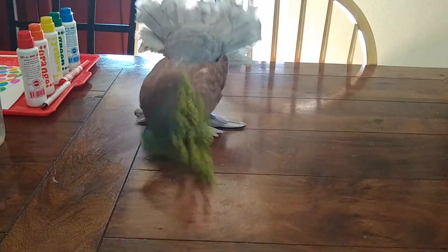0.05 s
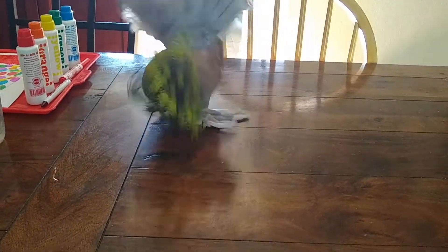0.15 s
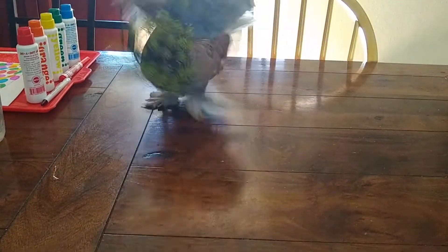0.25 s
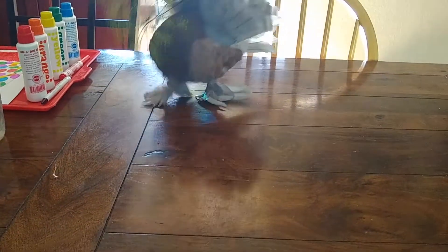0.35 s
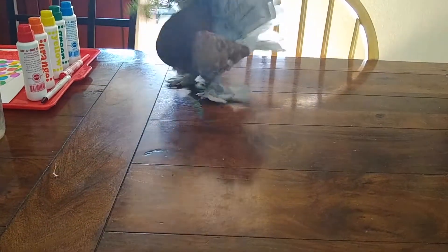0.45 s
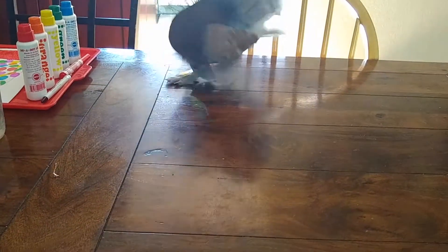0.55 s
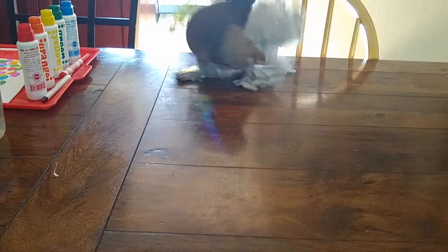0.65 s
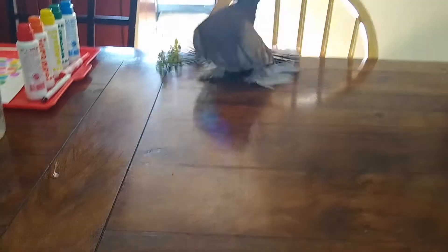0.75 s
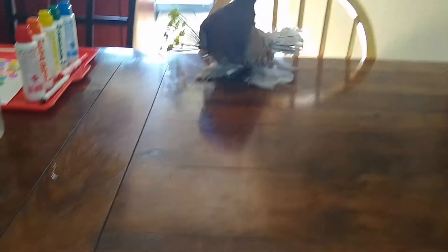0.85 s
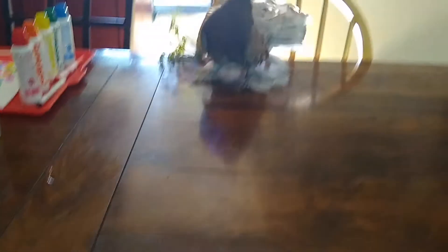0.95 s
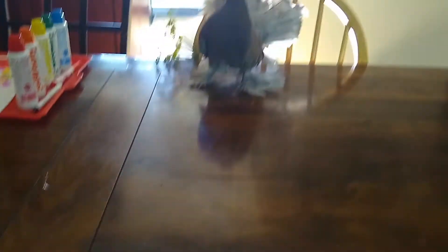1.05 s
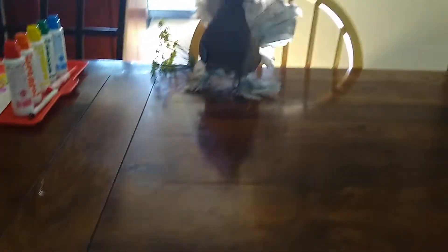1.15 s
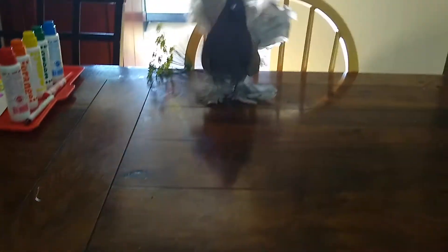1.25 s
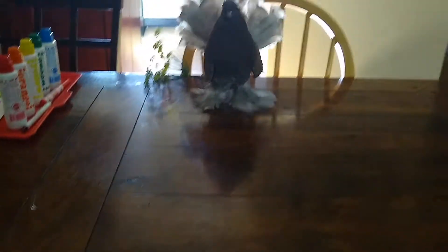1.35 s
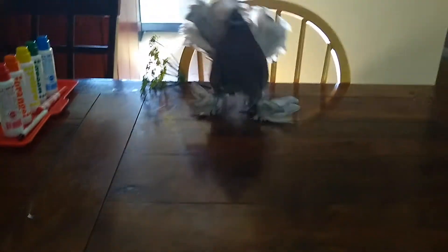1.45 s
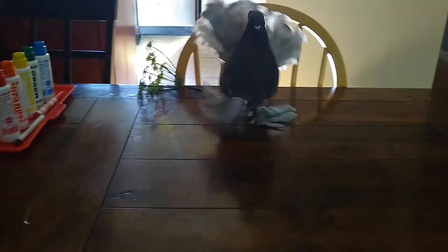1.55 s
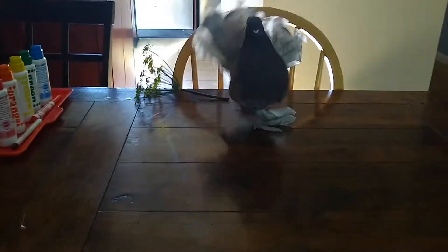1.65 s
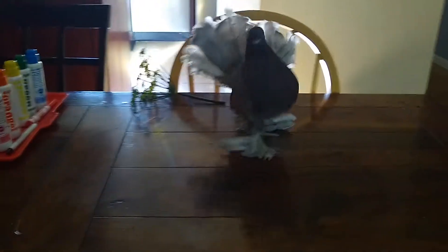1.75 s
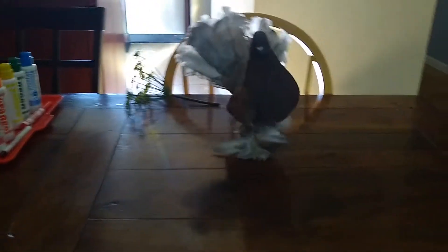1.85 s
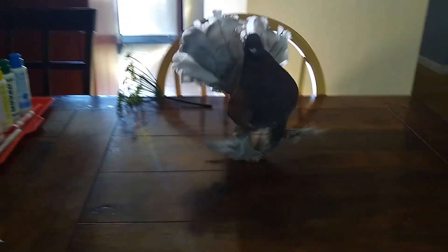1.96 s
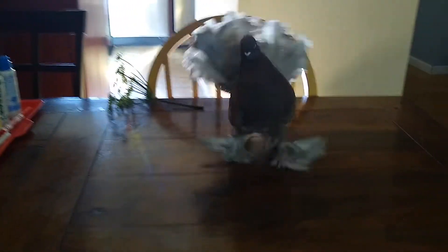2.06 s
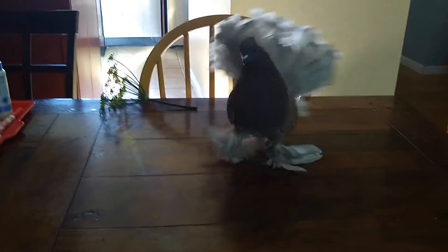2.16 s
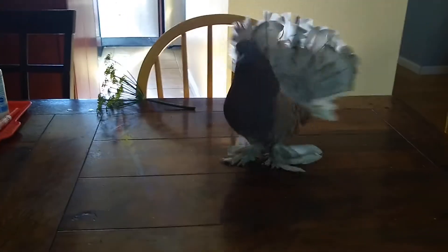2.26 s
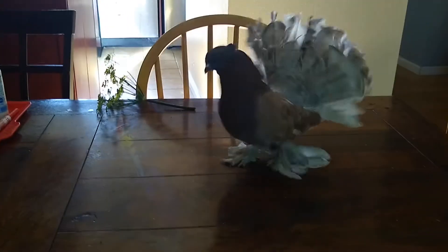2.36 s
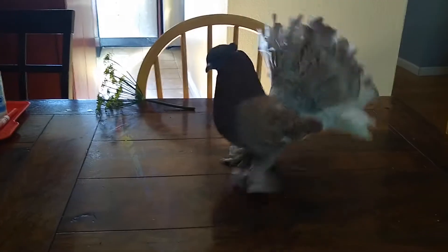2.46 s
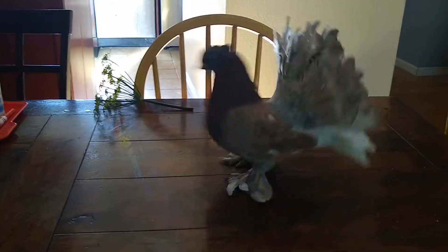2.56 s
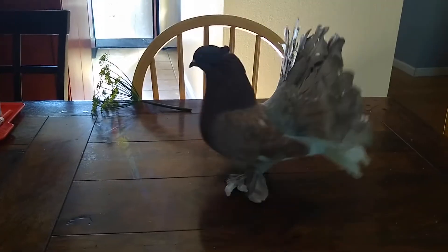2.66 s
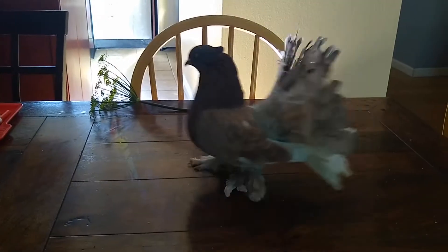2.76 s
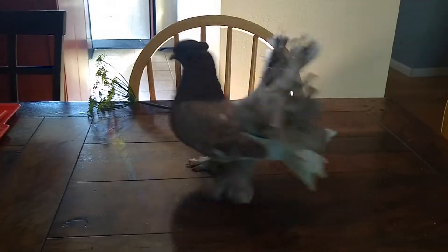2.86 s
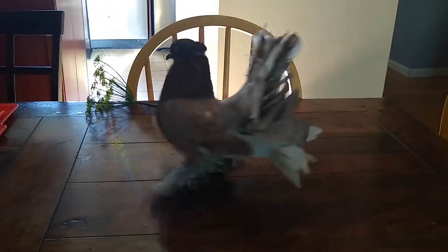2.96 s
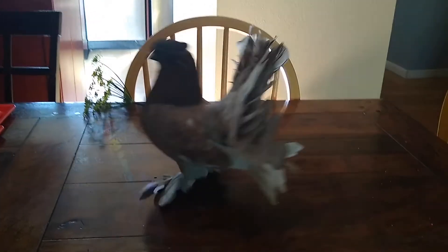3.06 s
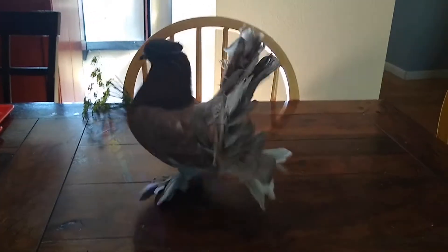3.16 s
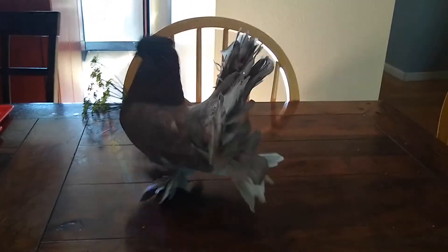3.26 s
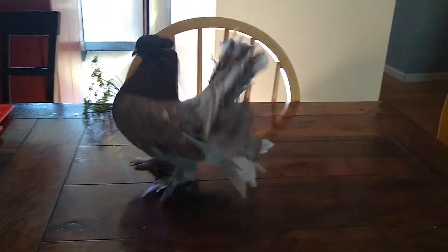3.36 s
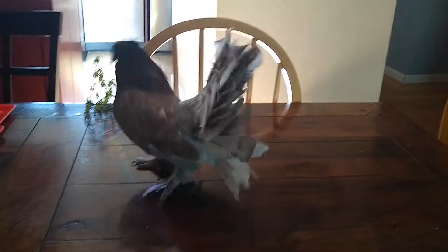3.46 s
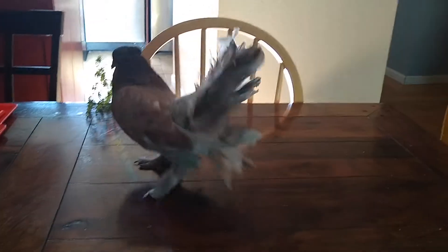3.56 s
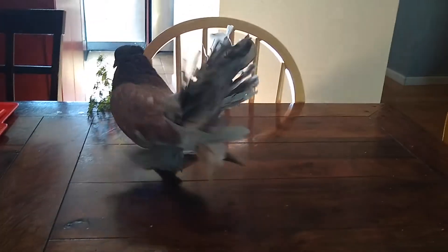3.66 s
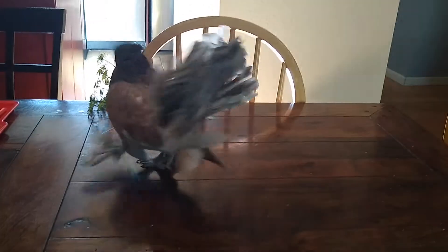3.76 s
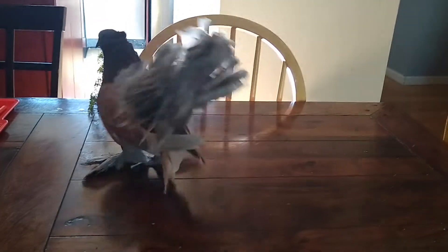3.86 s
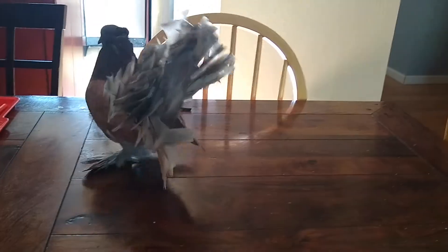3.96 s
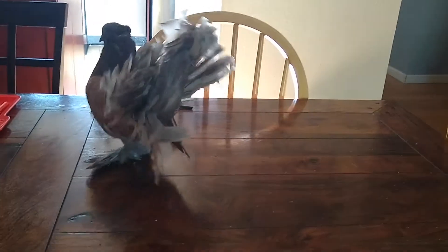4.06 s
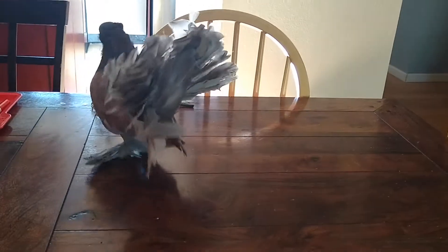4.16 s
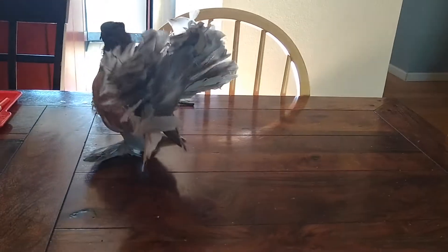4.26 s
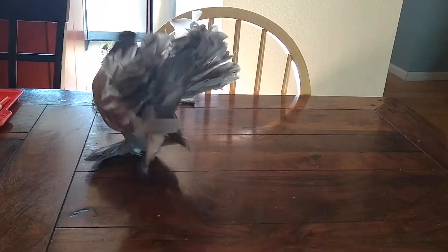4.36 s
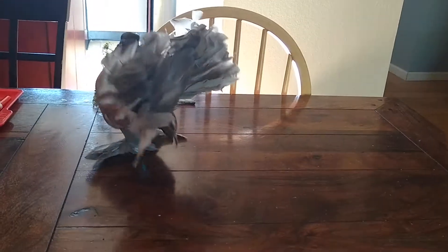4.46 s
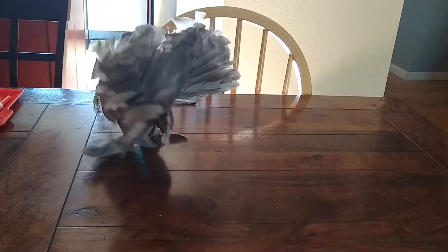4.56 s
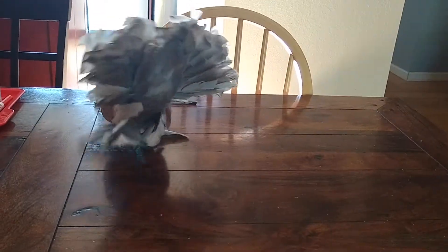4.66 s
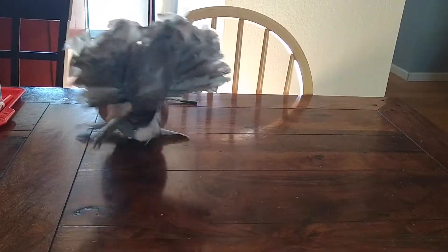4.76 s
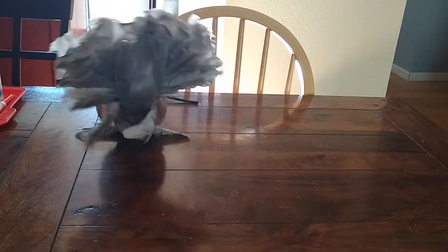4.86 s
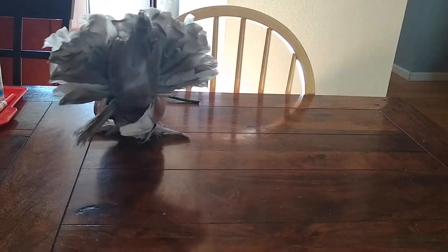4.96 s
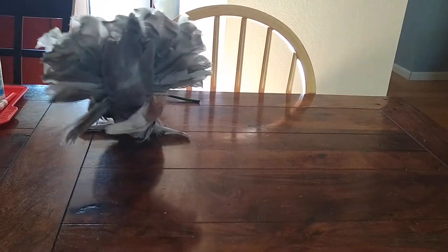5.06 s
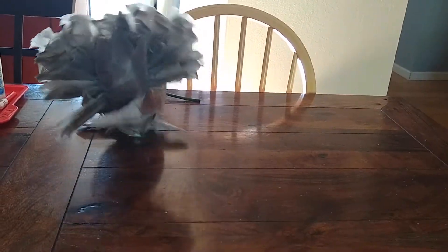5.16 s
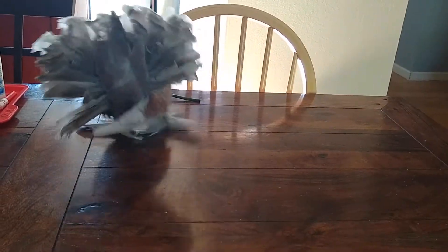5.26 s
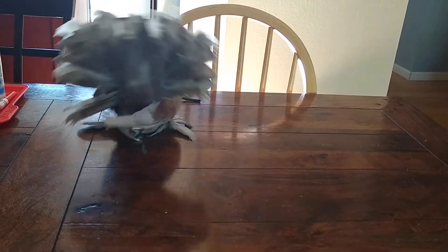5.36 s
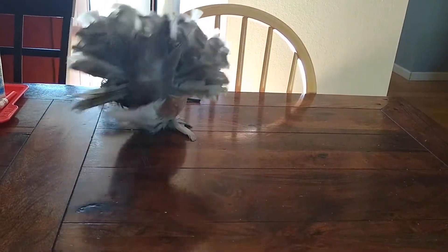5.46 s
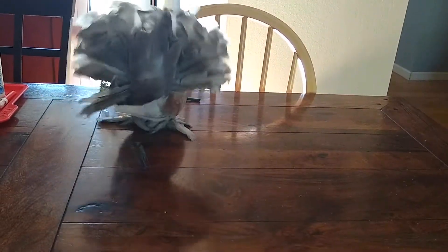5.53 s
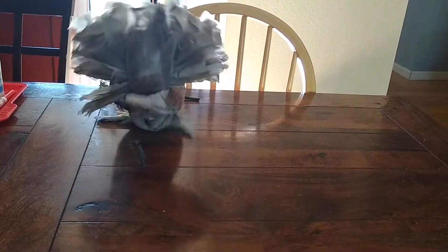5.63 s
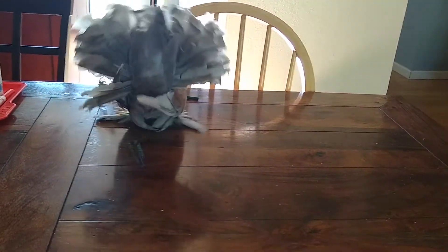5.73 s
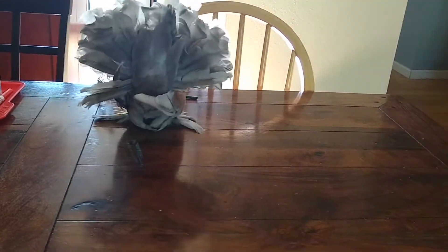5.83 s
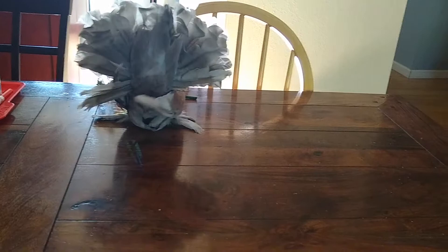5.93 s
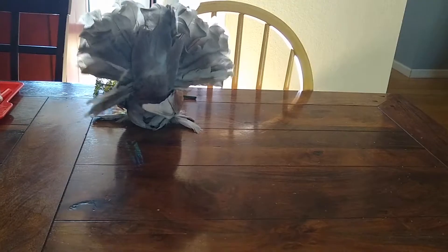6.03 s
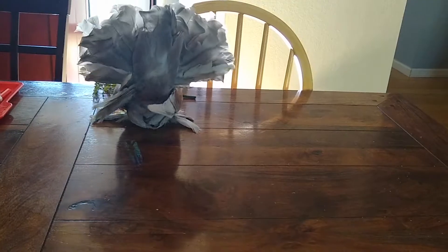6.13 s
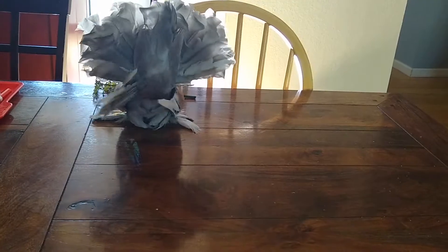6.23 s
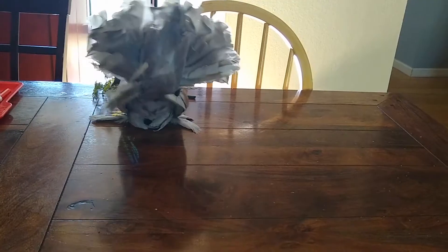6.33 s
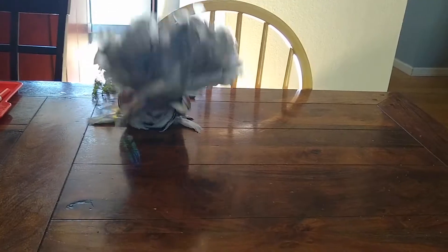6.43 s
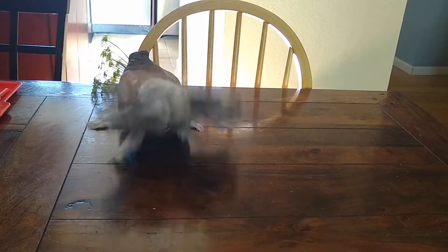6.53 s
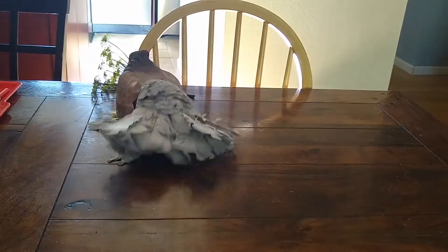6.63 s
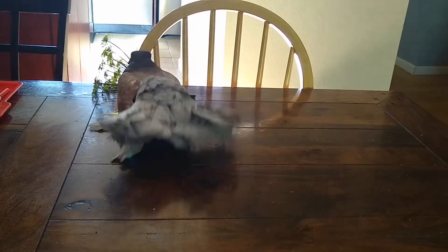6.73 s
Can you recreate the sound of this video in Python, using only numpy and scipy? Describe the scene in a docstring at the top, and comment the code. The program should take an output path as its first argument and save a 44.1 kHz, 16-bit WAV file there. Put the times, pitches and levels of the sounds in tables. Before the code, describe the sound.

A pigeon hops across a wooden tabletop with a few sharp knocks and claw clicks, then pads softly in a quiet ticking room.

```python
"""Pigeon on a wooden table

A pigeon hops and walks about on a table top: feet excite its modes, dragged feathers keep some humming.
Claws and quills are short filtered noise bursts; a diffuse rustle is grainy, uneven noise in three bands.
A wall clock ticks about once a second as decaying case modes, in a live room over a quiet hush.
A phone's two microphones are steered left and right by subtracting each, delayed, from the other."""
import sys
import numpy as np
from scipy import signal
from scipy.fft import rfft, irfft, next_fast_len
from scipy.io import wavfile
from scipy.ndimage import uniform_filter1d

SR = 44100
rng = np.random.default_rng(int(sys.argv[2]) if len(sys.argv) > 2 else 0)


def generate_wav(sig):
    """Save sig (samples, or channels by samples) to the path in sys.argv[1] as 16-bit PCM at SR."""
    pcm = np.round(np.clip(np.atleast_2d(sig).T, -1, 1) * 32767).astype(np.int16)
    wavfile.write(sys.argv[1], SR, pcm)


N = 299439
HZ = np.fft.rfftfreq(next_fast_len(N), 1 / SR)  # spectrum bins

# modes of the table top, before each foot or brush weights them: f/Hz, level/dB, t60/s
TABLE_MODES = [(107, -1, .12), (138.5, 3.5, 0.4), (160.8, 4.5, 0.18), (200, -11.5, 0.07), (222, -4, 0.062),
               (300, 3.5, 0.14), (324.2, 0.5, 0.18), (342.2, -20.5, .07), (397, 3, 0.14), (460, -7, 0.024),
               (526, -6.5, 0.12), (597.5, 0, .06), (631, 0.5, 0.059), (706, 1, 0.039), (772.4, 8, 0.054),
               (811.6, -0.5, 0.032), (856.5, -5, 0.0085), (1063, -8, 0.039), (1070, -1.5, .05),
               (1205, 8, 0.038), (1236, 3, 0.051), (1490, 2, 0.034), (1497, -7.5, 0.1),
               (1714.5, -2.5, 0.18), (1780, -8.5, 0.092), (1913, 2.5, 0.061), (2400, -9.5, 0.21),
               (2384, -5, 0.12), (2752, -10.5, 0.0099)]
# contact level at which the basic ring, scuff and scratch settings hold
HARD_DB = -15


def undb(db):
    """Level as the logarithm of amplitude: converts decibels to gain."""
    return 10 ** (np.asarray(db) / 20)


def band(x, hz, width):
    """Two-pole resonance: a band-pass with gain 1 at its centre."""
    b, a = signal.iirpeak(min(hz, .45 * SR), hz / width, SR)
    return signal.lfilter(b, a, x)


def shape(x, gain):
    """Linear filtering in the frequency domain: one gain for every bin of HZ."""
    spectrum = rfft(x, 2 * len(HZ) - 2)
    return irfft(spectrum * gain)[..., :N]


def ring(hz, db, t60, turn=0, seconds=.4):
    """Modal superposition: decaying sines, each starting at its own part of a turn, scaled to peak 1."""
    t = np.arange(int(seconds * SR))[:, None] / SR
    decay = 1000. ** (-t / t60)
    modes = undb(db) * np.sin(2 * np.pi * (hz * t + turn)) * decay
    x = modes.sum(axis=1)
    return x / abs(x).max()


def add(out, s, x, lag_ms):
    """Difference in arrival time: mixes a sound into both ports, the right one later by the lag."""
    for port, late in enumerate((-lag_ms / 2000, lag_ms / 2000)):
        i = int((s + late) * SR)
        out[port, i:i + len(x)] += x[:N - i]


def walk(rate):
    """Slow random modulation: levels held 1 / rate s and slewed twice, with a spread near 0.3."""
    k = int(SR / rate)
    held = np.repeat(rng.standard_normal(N // k + 1), k)
    return 0.43 * uniform_filter1d(uniform_filter1d(held, k), k)[:N]


def steps(rise_ms=0.18, toes=0.485, toe_ms=2.09, lift_octaves=0.18, scatter=0.15):
    """Impact excitation of modes: the pad sinks in, a second toe follows, and the foot scuffs as it settles."""
    # feet landing: t/s, level/dB, bass share/dB, upper share/dB, favoured f/Hz, its lift/dB
    landings = [(0.115, -56, -7, -2, 980, 9), (0.218, -55.5, 0, 4, 646, 2), (0.266, -19, 2.5, 5, 1030, 2.5),
                (0.556, -14.5, -11.5, -6, 640, 1.5), (0.716, -37.5, 3.5, -6, 607, 11),
                (0.862, -10.5, -8.5, -2.5, 799, -3), (1.372, -28.5, -3.5, -7.5, 728, -0.5),
                (1.87, -46, 3, 0.5, 794, 4.5), (2.186, -51, 4.5, 0, 571, 7),
                (2.368, -43, -3, -3, 145, 19.5), (2.431, -54, -9, -2, 967, 2),
                (2.598, -51, 2, -10.5, 433, 7.5), (2.871, -47, 7.5, -6, 432, 7),
                (3.114, -48, 1.5, -12, 636, 7), (3.411, -47.5, -5, 7.5, 770, 4.5),
                (3.942, -49, 1.5, 3, 843, 1.5), (4.179, -42.5, -2.5, -1.5, 1400, 8.5),
                (4.904, -46, 3, 1, 515, 12.5), (5.399, -57.5, 0, -5.5, 293.4, 9),
                (5.603, -49.5, 1.5, -9.5, 511, 8), (5.802, -57.5, 4, -0.5, 760, 8)]
    # where bass share, full level and upper share apply: f/Hz
    share_hz = (185, 590, 1440)
    spot_db = 2.5  # each landing spot stirs the modes a little differently
    # softer steps ring longer and scuff more against the direct knock
    ring_stretch, stretch_per_db = .55, 0.0347
    scuff_db, scuff_db_per_db = -9, 0.1442
    scuff_ms, scuff_ms_per_db = 24., 0.78
    pad_hz = 800  # the soft pad damps modes above this, more the higher they are
    out, t = np.zeros((2, N)), np.arange(SR // 4) / SR
    hz, db, t60 = np.transpose(TABLE_MODES)
    chance = rng.standard_normal((len(landings), 3, len(hz)))
    scuffs = rng.standard_normal((len(landings), len(t)))
    for landing, (spot, detune, turn), scuff in zip(landings, chance, scuffs):
        s, level_db, bass_db, upper_db, best_hz, lift_db = landing
        softer_db = HARD_DB - level_db
        stretch = ring_stretch + stretch_per_db * softer_db
        share_db = np.interp(np.log(hz), np.log(share_hz), (bass_db, 0, upper_db))
        share_db += lift_db * np.exp(-(np.log2(hz / best_hz) / lift_octaves) ** 2)
        share_db += spot_db * spot
        step_t60 = t60 * max(stretch, .1) * np.minimum(pad_hz / hz, 1)
        x = ring(hz * (1 + 0.0057 * detune), db + share_db, step_t60, scatter * turn)
        x = x * (1 - np.exp(-1000 * np.arange(len(x)) / SR / rise_ms))
        # the force on the top: scuffing noise, the landing and the second toe
        fade = np.exp(-1000 * t / (scuff_ms + scuff_ms_per_db * softer_db))
        scuff_gain = undb(scuff_db + scuff_db_per_db * softer_db)
        push = scuff_gain * scuff * fade / np.sqrt((fade ** 2).sum())
        push[[0, int(toe_ms * SR / 1000)]] += 1, toes
        step = signal.fftconvolve(x, push) * undb(level_db)
        # levelled by the ring's first 400 samples
        add(out, s, step * .4 / x[:400].std(), lag_ms=0.07)
    return out


def slides(reach_octaves=0.11, lag_ms=.1):
    """Sustained friction excitation: a dragged, feathered foot keeps the modes near one pitch humming."""
    # drags over the top: t/s, length/s, rms level/dB, favoured f/Hz
    drags = [(5.4, 0.092, -63.5, 342), (5.46, 0.072, -64, 155), (6.3, 0.079, -71, 315),
             (5.8, 0.108, -69, 367), (2.37, 0.066, -59.5, 130)]
    out = np.zeros((2, N))
    for s, length, level_db, best_hz in drags:
        brush = rng.standard_normal(SR // 4)[:int(length * SR)]
        brush = brush * signal.windows.tukey(len(brush), .15)
        brush = np.append(brush, np.zeros(SR // 4))  # time to ring out
        hum = 0
        for hz, mode_db, t60 in TABLE_MODES:
            nearness = np.exp(-(np.log2(hz / best_hz) / reach_octaves) ** 2)
            width = np.log(1000) / np.pi / t60  # bandwidth that decays in t60
            hum = hum + undb(mode_db) * nearness * band(brush, hz, width)
        add(out, s, undb(level_db) * hum / hum[:int(length * SR)].std(), lag_ms)
    return out


def claws(width_hz=2200.):
    """Band-limited noise burst: a short scratch rings near its pitch, with a thinner snap above."""
    # claw tips on the varnish: t/s, level/dB, f/Hz, treble share/dB
    taps = [(0.17, -52, 2760, -11), (0.219, -42.5, 3160, -4), (0.2618, -34, 3530, -15),
            (0.2659, -25.5, 3400, -5.5), (0.415, -44.5, 3420, -6), (0.4311, -49.5, 3180, -30),
            (0.4902, -51, 3630, -3), (0.5502, -30, 3200, -14), (0.552, -19.5, 3120, -7),
            (0.714, -36, 3400, -7), (0.719, -39.5, 3410, -4), (0.8458, -41.5, 2862, -10),
            (0.8567, -33.5, 3530, -19), (0.8611, -11.5, 3250, -10), (1.0765, -53.5, 3320, -13),
            (1.208, -55.5, 3430, -18), (1.3724, -26.5, 3340, -11), (1.5541, -48, 3750, -8),
            (1.669, -54, 3900, -19), (1.8628, -39, 3930, -4.5), (2.1772, -47.5, 3630, -5),
            (2.359, -50.5, 3920, -7), (2.367, -56, 3200, -19), (2.43, -56, 3880, 6),
            (2.868, -58.5, 3410, -15.5), (3.098, -53.5, 3560, 2), (3.114, -55, 3300, -12.5),
            (3.41, -42, 2880, -3), (3.9396, -50, 3100, -5.5), (4.1674, -52, 3400, -21.5),
            (4.1774, -48, 3020, -6.5), (4.732, -56, 3560, -8), (4.9053, -49.5, 3330, -30),
            (5.392, -56.5, 3480, 6), (5.407, -48, 3900, -22.5), (5.6032, -54, 3080, -20),
            (5.733, -56.5, 3210, -13.5), (5.7747, -55.5, 3420, -20), (5.8, -57.5, 3200, -20)]
    scratch_ms, scratch_ms_per_db = 1.4, 0.01  # softer scratches last longer
    snap_ms = 2.3  # decay of the treble crackle
    out, t = np.zeros((2, N)), np.arange(1500) / SR
    for s, level_db, hz, treble_db in taps:
        body, snap = rng.standard_normal((2, len(t)))
        ms = scratch_ms + scratch_ms_per_db * (HARD_DB - level_db)
        fade = np.exp(-1000 * t / max(ms, .3)) * (1 - np.exp(-t / .0003))
        body = band(band(fade * body, hz, width_hz), hz, width_hz)
        snap = band(np.exp(-1000 * t / snap_ms) * snap, 11000.0, 12000.)
        scratch = body / abs(body).max() + undb(treble_db) * snap / abs(snap).max()
        add(out, s, undb(level_db) * scratch, lag_ms=.075)
    return out


def quills():
    """Impulsive release: dry snaps of quills as treble noise with a fast exponential decay."""
    # snaps: t/s, peak level/dB
    snaps = [(6.3874, -63), (6.6067, -67), (6.62, -50), (6.6328, -49), (6.6444, -61), (6.6564, -58)]
    out, t = np.zeros((2, N)), np.arange(1500) / SR
    for s, level_db in snaps:
        snap = np.exp(-t / .0012) * rng.standard_normal(len(t))
        snap = band(band(snap, 11000.0, 6000.), 11500.0, 6000.)
        add(out, s, undb(level_db) * snap / abs(snap).max(), lag_ms=.05)
    return out


def rustle(grain_db=4.5):
    """Modulated band noise: a diffuse rustle in three broad bands, grainy and uneven."""
    # level of the lowest band over time: t/s, level/dB
    rustle_levels = [(0.0, -91), (0.17, -67), (0.35, -65), (0.5, -69.5), (0.63, -60), (0.8, -64),
                     (1.08, -65.5), (1.25, -81.5), (1.55, -66.5), (1.75, -76), (2.36, -73), (2.61, -87),
                     (2.84, -77.5), (3.52, -82.5), (4.2, -75), (4.52, -89), (5.69, -81), (6.03, -91),
                     (6.79, -86)]
    level_db = np.interp(np.arange(N) / SR, *np.transpose(rustle_levels))
    out = 0
    # share/dB, centre/Hz, width/Hz
    for share_db, hz, width in ((0, 600., 900.), (-11.5, 3400., 3000.), (-15.5, 11000., 10000.)):
        grains = rng.standard_normal((2, N)) * undb(grain_db * walk(60))
        noise = band(band(grains, hz, width), hz, width)
        out = out + noise / noise.std() * undb(level_db + share_db)
    return out


def clock(first_s=.7665, period_s=.9997, level_db=-52.5, lag_ms=0.034):
    """Periodic excitation of a resonant case: odd and even ticks ring its modes differently."""
    # case modes: f/Hz, level in odd ticks/dB, level in even ticks/dB, t60/s
    case_modes = [(850, -1, -9, .025), (1380, -14, -.1, .025), (1550, -4, -5, .02)]
    out = np.zeros((2, N))
    hz, odd_db, even_db, t60 = np.transpose(case_modes)
    for k, s in enumerate(np.arange(first_s, N / SR, period_s)):
        tick = ring(hz, odd_db if k % 2 else even_db, t60)
        tick = np.convolve(tick, np.hanning(30))  # softens the onset
        add(out, s, undb(level_db) * tick / abs(tick).max(), lag_ms)
    return out


def room(x, build_ms=1.3, alike_hz=1205.0, alike_most=.995):
    """Early reflections and diffuse decay: a few echoes, then a tail alike at the ports in the bass only."""
    # nearest surfaces: delay/ms, level before dulling/dB
    early_echoes = [(4.2, 2), (8.4, 0), (17, -17.5)]
    # bands of the tail: f/Hz, t60/s, relative level/dB
    decay_bands = [(130.3, 0.32, -11), (250, .4, -5.5), (492, 0.25, -6), (1040, 0.29, -5.5),
                   (1907, .35, -11), (4200, 0.15, -17.5), (8260, .2, -13.5), (13900, 0.28, -11.5)]
    t = np.arange(SR // 2) / SR
    response = np.zeros((2, len(t)))
    for k, (ms, db) in enumerate(early_echoes):
        # the ports take turns to hear an echo 9 samples late
        late = np.array([k % 2, 1 - k % 2]) * 9
        response[[0, 1], int(ms * SR / 1000) + late] += undb(db)
    # soft furnishings dull the first echoes
    response = signal.lfilter(*signal.butter(2, 1620, fs=SR), response)
    response[:, 0] += 1  # direct sound
    for hz, t60, db in decay_bands:
        alike = min(alike_most, 1) * np.exp(-(hz / alike_hz) ** 2)
        mid, side = rng.standard_normal((2, len(t)))
        opposed = side * np.array([[1], [-1]])
        noise = np.sqrt((1 + alike) / 2) * mid + np.sqrt((1 - alike) / 2) * opposed
        fade = 1000. ** (-t / t60) * (1 - np.exp(-1000 * t / build_ms))
        tail = band(band(noise, hz, hz), hz, hz) * fade
        response += undb(db) * tail / np.sqrt((fade ** 2).sum()) * 2
    return signal.fftconvolve(x, response, axes=1)[:, :N]


def hush(swell_db=-3.0):
    """Partial coherence: a gently swelling house background, partly common to both ports."""
    # spectrum before the swell: f/Hz, level per Hz/dB, likeness of the two ports
    hush_levels = [(30.37, -84, .3), (59, -87.5, 0.44), (99, -89.5, 0.95), (174, -91.5, 0.36),
                   (260, -92.5, 0.58), (426, -97.5, 0.35), (707, -102, 0.38), (1140, -108, 0.051),
                   (2400, -112, 0.013), (3400, -115, .01), (4750, -120, .01), (5997, -127, .01),
                   (15000, -132, 0.016)]
    log_hz = np.log(np.array(hush_levels)[:, 0])
    _, db, alike = (np.interp(np.log(HZ + 1), log_hz, c) for c in np.transpose(hush_levels))
    alike = np.clip(alike, 0, 1)
    mid, side = rng.standard_normal((2, N)) * np.sqrt(SR / 4) * undb(swell_db * walk(3.6))
    mid = shape(mid, undb(db) * np.sqrt(1 + alike))
    side = shape(side, undb(db) * np.sqrt(1 - alike))
    return np.array([mid + side, mid - side])


def scene():
    """Superposition at the two microphone ports: contacts and clock through the room, plus diffuse noise."""
    sources = steps() + slides() + claws() + quills() + clock()
    return room(sources) * undb(-3.0) + rustle() + hush()


def record(dry):
    """Delay-and-subtract directivity: each channel loses a delayed copy of the other port; hiss is added."""
    # amplifier hiss, before the band limits: f/Hz, level per Hz/dB
    hiss_levels = [(200, -116), (1500, -119), (7000, -118.5), (12000, -118), (15500, -115)]
    steer_share, steer_ms = .95, .4475
    steer_hz = 9000  # the steering fades above this
    delay = np.exp(-2j * np.pi * HZ * steer_ms / 1000)
    steer = steer_share * delay / (1 + (HZ / steer_hz) ** 4)
    hiss_hz, hiss_db = np.transpose(hiss_levels)
    hiss = undb(np.interp(np.log(HZ + 1), np.log(hiss_hz), hiss_db)) * np.sqrt(SR / 2)
    out = dry - shape(dry[::-1], steer) + shape(rng.standard_normal((2, N)), hiss)
    # the right channel is lifted by 0.5 dB around 7900 Hz
    lift_db = 0.5 * np.exp(-(np.log(HZ / 7900 + 1e-9) / 0.34) ** 2)
    out[1] = shape(out[1], undb(lift_db))
    # both ends of the spectrum are cut
    bass_cut = signal.butter(3, 75, "high", fs=SR, output="sos")
    top_cut = signal.ellip(10, .2, 80, 15550, fs=SR, output="sos")
    return signal.sosfilt(top_cut, signal.sosfilt(bass_cut, out))


dry = scene()
out = record(dry)
generate_wav(out)
```